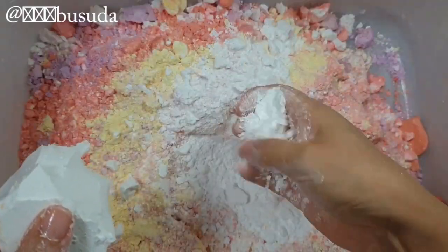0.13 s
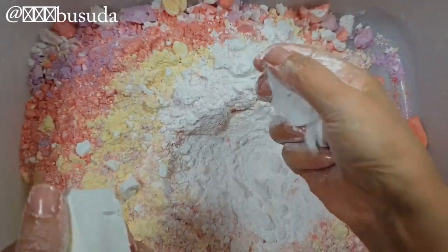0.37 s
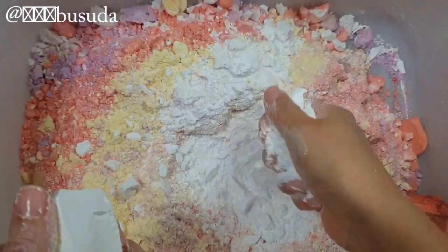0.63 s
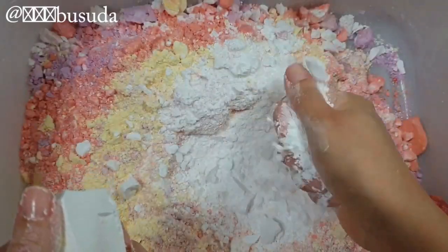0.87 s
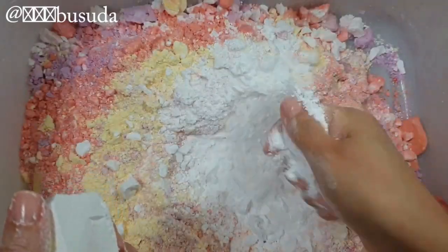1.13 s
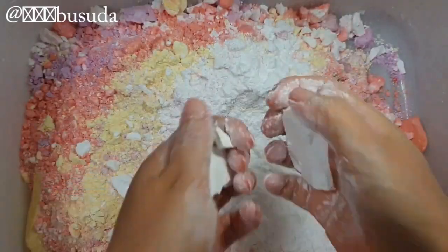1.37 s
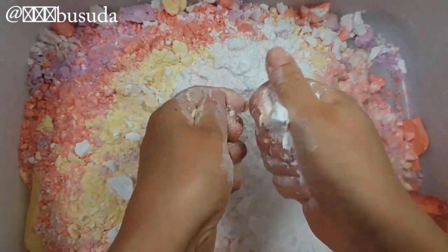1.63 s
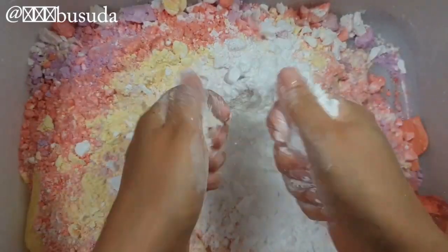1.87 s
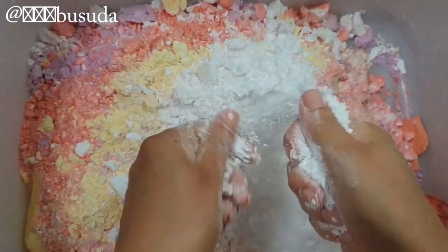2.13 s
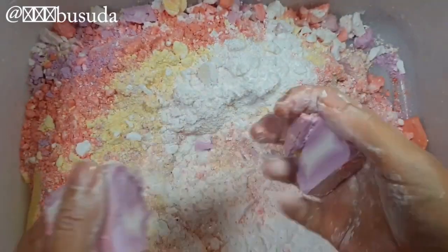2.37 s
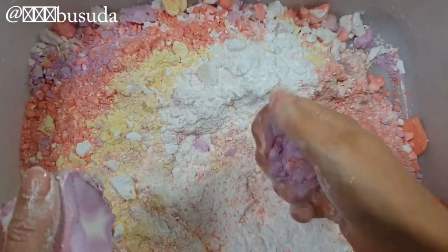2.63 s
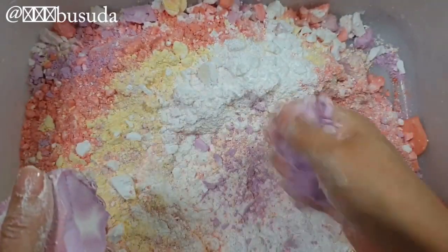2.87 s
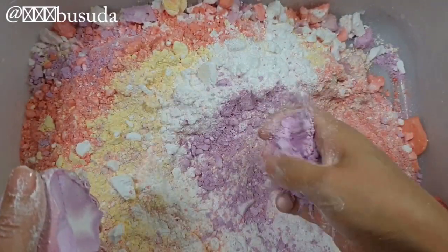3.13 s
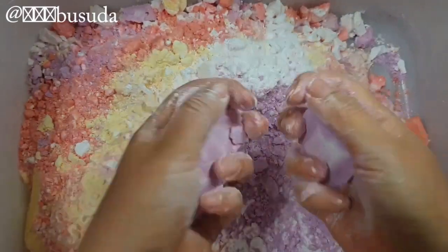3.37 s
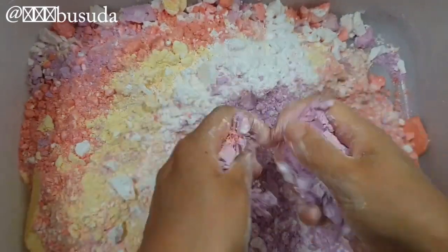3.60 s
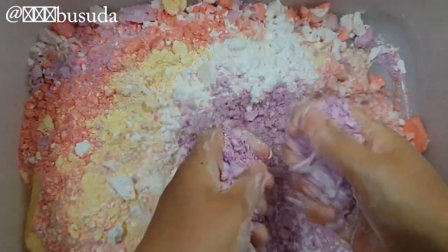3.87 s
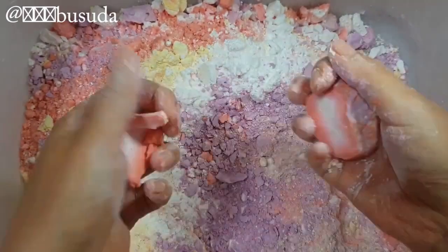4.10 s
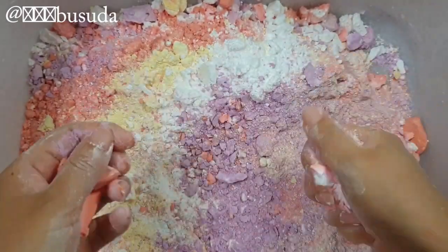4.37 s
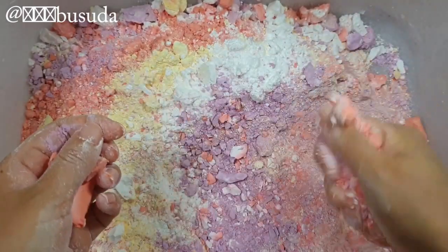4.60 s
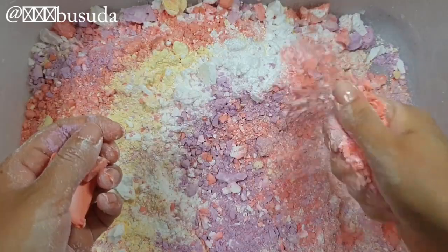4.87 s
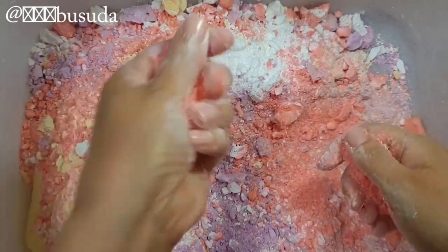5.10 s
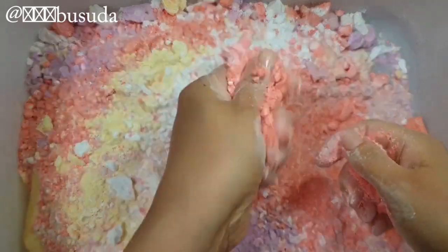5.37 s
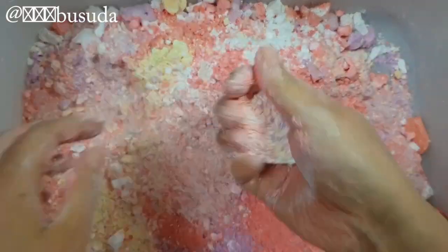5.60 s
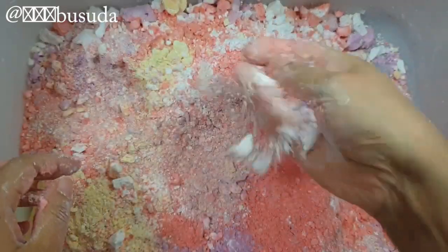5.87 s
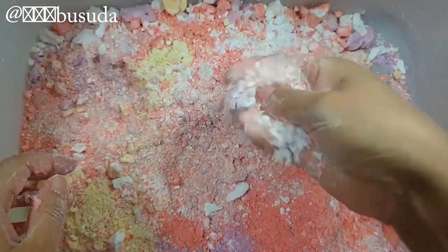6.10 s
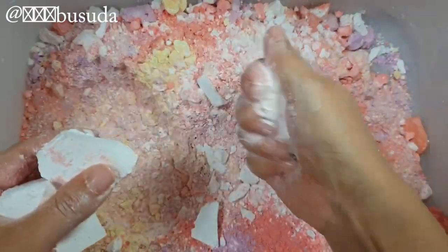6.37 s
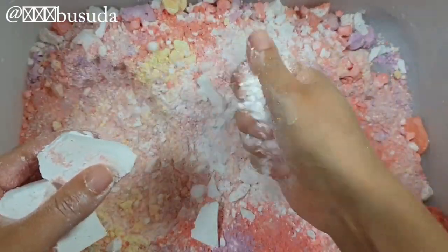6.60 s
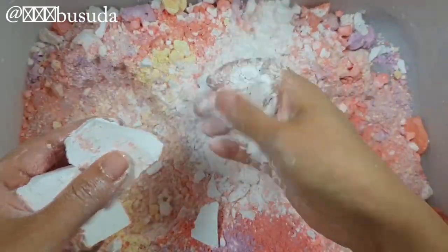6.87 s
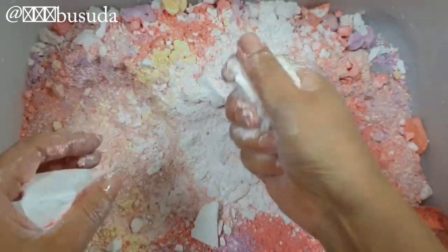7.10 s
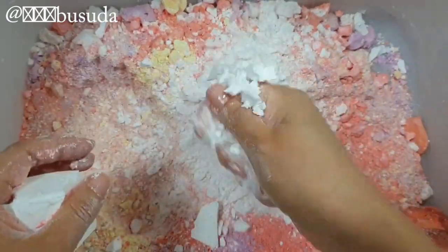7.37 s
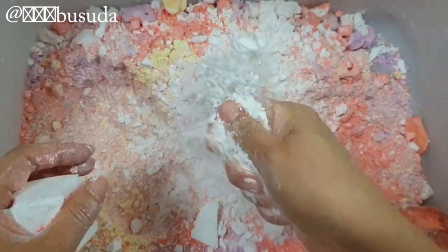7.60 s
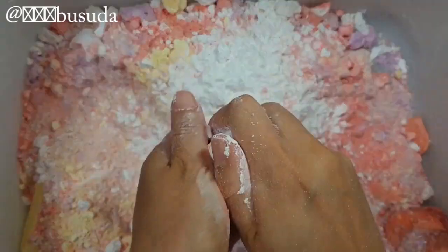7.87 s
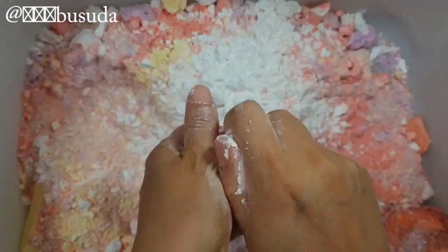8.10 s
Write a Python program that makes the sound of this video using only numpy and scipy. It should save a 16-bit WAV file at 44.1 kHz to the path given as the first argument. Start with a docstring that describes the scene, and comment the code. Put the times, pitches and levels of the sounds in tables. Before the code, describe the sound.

Dry chalk snaps and crumbles in cupped palms, fine powder rustling through the fingers while lumps thud softly onto a heap in a tub.

```python
"""Close above a plastic tub, one microphone: hands squeeze soft chalk blocks. The blocks crack and crunch in
the cupped palms: sharp splits ring the hollow of the hand, and swarms of tiny breaking pieces follow each
squeeze. Powder hisses through the fingers as coloured grains, chunks thud against the tub wall and one hard
piece squeaks. Crumbs and lumps drop on the heap and drum on the tub's resonances, over a faint room noise."""
import sys
import numpy as np
from scipy import signal
from scipy.fft import rfft, irfft, next_fast_len
from scipy.io import wavfile
from scipy.ndimage import map_coordinates

SR = 44100
rng = np.random.default_rng(int(sys.argv[2]) if len(sys.argv) > 2 else 0)


def bounce(signal):
    """Save signal as a 16-bit WAV file at the path given by the first command-line argument."""
    frames = np.transpose(np.atleast_2d(signal))
    limited = np.clip(frames, -1, 1)
    pcm = np.round(limited * 32767).astype(np.int16)
    wavfile.write(sys.argv[1], SR, pcm)


def field_ratio(decibels):
    """Amplitude ratio for a level in dB (20 dB per decade); scalars and array-likes work."""
    return 10 ** (np.asarray(decibels, dtype=float) / 20)


N = 362943  # length in samples

# Resonances of the tub under the heap. Each row: centre in Hz, width in Hz, relative level in dB.
TUB_MODES = [(111.6, 11.2, 2.5), (147.2, 17.7, 3), (235.2, 7.5, 2.5), (322.2, 21, -4), (555.7, 65, -3)]
# Hollow of the cupped palms and chalk pieces. Each row: centre in Hz, width in Hz, relative level in dB.
PALM_MODES = [(1550, 400, 7), (1932, 370, 9.5), (2434, 460, 3.5), (3160, 360, 3), (5390, 2500, -4.5)]
# Moments where all crunching, sifting and cracking falls silent at once, in seconds; the last lies past the
# end.
BREAK_OFFS = [0.21, 1.42, 3.306, 4.165, 7.098, 7.786, 8.002, 9]


def unit(x):
    """Scaled to rms 1."""
    return x / np.sqrt(np.mean(x ** 2) + 1e-20)


def along(points, hz):
    """Values of (Hz, value) points, read on a log frequency axis."""
    f, v = np.transpose(points)
    return np.interp(np.log(hz + 1), np.log(f + 1), v)


def wobble(rate):
    """A smooth random curve, rate knots a second."""
    knots = rng.standard_normal(int(N * rate / SR) + 4)
    return map_coordinates(knots, [np.arange(N) * rate / SR])


def filtered(x, response):
    """x times a complex response of frequency."""
    m = next_fast_len(N + SR // 2)
    return irfft(rfft(x, m) * response(np.fft.rfftfreq(m, 1 / SR)), m)[..., :N]


def coloured(x, spectrum):
    """x through a (Hz, dB) spectrum."""
    return filtered(x, lambda hz: field_ratio(along(spectrum, hz)))


def ringing(x, modes):
    """x exciting damped resonances in parallel, with alternating signs."""
    def response(f):
        total = 0
        for k, (centre, width, db) in enumerate(modes):
            resonance = 1j * f * width / (centre ** 2 - f ** 2 + 1j * f * width)
            total = total + (-1) ** k * field_ratio(db) * resonance
        return total
    return filtered(x, response)


def soft(x, hz):
    """A soft contact: the push is rounded off above hz."""
    return filtered(x, lambda f: 1 / (1 + 1j * f / hz) ** 2)


def grains(per_s, spread_db):
    """Tiny random impulses: most are faint, a few strong."""
    hit = rng.random(N) < per_s / SR
    size = np.minimum(rng.exponential(size=N), 3.5)
    return hit * field_ratio(spread_db * size) * rng.choice([-1, 1], N)


def pieces(level_db, centre_hz, scatter, cycles, spread_db, count):
    """Small pieces break one by one, each a short, softly starting ring at its own pitch."""
    at = rng.integers(0, N, count)
    pitch = np.clip(rng.standard_normal(count), -2, 2)
    size = np.minimum(rng.exponential(size=count), 3.5)
    turns = centre_hz * np.exp(scatter * pitch)[:, None] * np.arange(300) / SR
    swing = np.sin(2 * np.pi * turns) * turns * np.exp(-turns / cycles)
    ring = field_ratio(spread_db * size)[:, None] * swing
    scale = np.sqrt(np.sum(ring ** 2) / N)
    where = (at[:, None] + np.arange(ring.shape[1])).ravel()
    levelled = (ring * field_ratio(level_db[at])[:, None]).ravel()
    return np.bincount(where, levelled, N + ring.shape[1])[:N] / scale


def gestures(rows, sag_db_per_s):
    """Summed power of (start, length, dB) gestures that rise, hold and fall; at the next stop each falls silent
    at once."""
    # pressure builds fast, eases while held and lets go more slowly
    rise_db_per_s, fall_db_per_s = 799.5, 466
    # last grains trickle on under the held level and die away
    trail_db, trail_db_per_s = -20.5, 87.5
    t = np.arange(0, N / SR + .001, .001)
    s, length, db = np.transpose(rows)[:, :, None]
    after = t - s - length
    rise_db = rise_db_per_s * np.minimum(t - s, 0)
    sag_db = sag_db_per_s * np.clip(t - s, 0, length)
    shape_db = rise_db - sag_db - fall_db_per_s * np.maximum(after, 0)
    trickle_db = np.where(t > s + length, trail_db - trail_db_per_s * after, -np.inf)
    shape_db = np.maximum(shape_db, trickle_db)
    going = t < np.take(BREAK_OFFS, np.searchsorted(BREAK_OFFS, s))
    power = np.sum(going * field_ratio(db + shape_db) ** 2, axis=0)
    return np.interp(np.arange(N) / SR, t, power)


def crushing():
    """Grains give way in the palms, dust rubs past dust, crumbs rain on the heap."""
    # Squeezes of the hand. Each row: start in seconds, length in seconds, nominal crunch level in dB.
    squeezes = [(0.021, 0.025, -52.5), (0.088, 0.11, -47), (0.244, 0.013, -55.5), (0.508, 0.062, -46),
                (0.629, 0.079, -44), (0.811, 0.0037, -41), (0.886, 0.11, -49), (1.054, 0.054, -57),
                (1.134, 0.11, -47), (1.24, 0.068, -53.5), (1.372, 0.029, -50.5), (1.611, 0.021, -44),
                (1.646, 0.069, -41.5), (1.747, 0.06, -54), (1.821, 0.02, -55), (1.879, 0.22, -46),
                (2.094, 0.053, -50.5), (2.158, 0.14, -43.5), (2.31, 0.014, -49.5), (2.612, 0.016, -44),
                (2.701, 0.034, -42.5), (2.812, 0.021, -57), (2.896, 0.12, -51.5), (3.108, 0.051, -51.5),
                (3.197, 0.031, -47.5), (3.29, 0.018, -50.5), (3.558, 0.053, -47), (3.731, 0.027, -49),
                (3.82, 0.21, -48.5), (4.02, 0.18, -53), (4.404, 0.037, -57), (4.577, 0.0093, -49),
                (4.652, 0.04, -48.5), (4.745, 0.026, -51.5), (4.904, 0.026, -44.5), (4.979, 0.044, -50.5),
                (5.053, 0.014, -54.5), (5.233, 0.054, -49.5), (5.369, 0.022, -60.5), (5.469, 0.13, -48),
                (5.773, 0.074, -56.5), (5.955, 0.0079, -53.5), (6.04, 0.092, -47), (6.25, 0.007, -61),
                (6.399, 0.063, -48), (6.552, 0.0076, -51), (6.632, 0.075, -42), (6.763, 0.039, -51.5),
                (6.846, 0.03, -43.5), (6.94, 0.082, -49.5), (7.06, 0.015, -46.5), (7.145, 0.07, -56),
                (7.241, 0.031, -42), (7.396, 0.016, -50.5), (7.463, 0.073, -45.5), (7.588, 0.081, -57),
                (7.68, 0.019, -44), (7.754, 0.027, -53), (7.938, 0.035, -49.5), (8.123, 0.075, -60)]
    # Powder rubbed through the fingers without crushing.
    # Each row: start in seconds, length in seconds, nominal hiss level in dB.
    sifts = [(0.338, 0.056, -49), (1.489, 0.18, -54.5), (2.53, 0.081, -56), (3.371, 0.073, -56.5),
             (3.484, 0.17, -57.5), (4.278, 0.017, -58), (4.358, 0.0027, -47), (5.135, 0.036, -59),
             (6.365, 0.052, -49), (7.756, 0.049, -51.5), (7.86, 0.021, -47), (8.155, 0.034, -54)]
    # Spectrum of the powder hiss. Each row: frequency in Hz, relative level in dB.
    powder_spectrum = [(2500, -38), (4500, -17.5), (6500, -9.5), (8800, -0.5), (11000, -6.5), (16500, -17)]
    # Crumbs drumming on the tub. Each row: time in seconds, nominal level in dB.
    crumb_rain = [(0, -50), (1.19, -40.5), (1.5, -51.5), (2.2, -41.5), (3.62, -42), (4, -36), (4.3, -35.5),
                  (4.62, -45), (4.8, -38.5), (5.59, -45.5), (8.23, -44.5)]

    rest_db = -86  # the hand at rest
    crunch_db = 10 * np.log10(gestures(squeezes, sag_db_per_s=43.5) + field_ratio(rest_db) ** 2)
    # a squeeze hisses too, by 0.32 dB more per dB of crunch
    dust = field_ratio(-57 + 0.32 * (crunch_db + 51.5)) ** 2
    powder_db = 10 * np.log10(dust + gestures(sifts, sag_db_per_s=2.0))
    # the grip sticks and slips, so everything in the hand comes in shared clumps
    slip = np.tanh(wobble(60))
    # the mix of fine and coarse grain in the hand keeps changing
    fine = np.tanh(wobble(9.8))
    # fine grit needs both pressure and sliding
    grit_db = 0.47 * crunch_db + 0.43 * powder_db - 3.0 + 2.1 * slip + 3 * fine

    grinding = unit(ringing(grains(per_s=800, spread_db=3.0), PALM_MODES))
    grinding *= field_ratio(crunch_db - 1.0 + 5.6 * slip)
    crunch = pieces(crunch_db - 0.5 + 1.2 * slip,
                    centre_hz=1780, scatter=0.15, cycles=1.3, spread_db=5.0, count=3500)
    # larger pieces yield with a dull thock, whose level follows the squeeze less steeply
    chunks = pieces(0.65 * crunch_db - 14.0 + 8.8 * slip,
                    centre_hz=460, scatter=0.39, cycles=0.45, spread_db=2.0, count=2500)
    # a few hard nuggets pop, each at a pitch of its own
    nuggets = pieces(0.86 * crunch_db - 11.0,
                     centre_hz=2600, scatter=0.53, cycles=0.54, spread_db=6.5, count=800)
    grit = pieces(grit_db, centre_hz=5490, scatter=0.055, cycles=0.26, spread_db=-2.0, count=9000)
    powder = unit(coloured(grains(per_s=3600, spread_db=3.5), powder_spectrum))
    powder *= field_ratio(powder_db + 4.0 * slip + 2.4 * wobble(25))

    # crumbs fall louder while the hand squeezes; the tub rings on after them
    crumbs = soft(grains(per_s=300, spread_db=4.5), hz=294)
    crumb_s, crumb_db = np.transpose(crumb_rain)
    crumbs_db = np.interp(np.arange(N) / SR, crumb_s, crumb_db)
    falling_db = crumbs_db + 0.29 * (crunch_db - crunch_db.mean()) + 4.5 * np.tanh(wobble(25))
    # they land now mid-floor, now near the wall, and wake the low or the high modes more
    place_db = 4 * np.tanh(wobble(6))
    floor = ringing(field_ratio(falling_db + place_db) * crumbs, TUB_MODES[:2])
    wall = ringing(field_ratio(falling_db - place_db) * crumbs, TUB_MODES[2:])
    drumming = (floor + wall) / np.std(ringing(crumbs, TUB_MODES))
    return grinding + crunch + chunks + nuggets + grit + powder + drumming


def cracks():
    """A block creaks, splits in one sharp step and tears raggedly for some ms; a crumb only ticks."""
    # Cracks of a block. Each row: time in seconds, nominal snap level in dB,
    # splinter in dB relative to the snap, knock in dB relative to the snap.
    block_cracks = [(0.498, -26, 1.5, 3.5), (0.5331, -16, -1.5, -9), (0.5375, -18.5, -5, -16.5),
                    (0.613, -41, 3, 0), (0.636, -22.5, -4, -11), (0.6467, -15.5, -35, -14),
                    (0.71, -30, -20, -8), (1.5995, -8.5, -8, -19.5), (1.6735, -11, -6, -11),
                    (1.6854, -10, -13, -18), (1.7612, -24, -4, -6), (1.8987, -30, -5, -5),
                    (2.016, -31, -5.5, -11.5), (2.3066, -41, -13, -7.5), (2.6109, -26.5, -6, 0.5),
                    (3.246, -33.5, -6.5, -5.5), (3.5482, -24.5, -2, -4), (3.5577, -18.5, -39, -12.5),
                    (3.588, -23, -15, -9.5), (3.603, -26.5, -16, -7.5), (3.8793, -33.5, -5, -0.5),
                    (4.028, -32, -30, -11), (4.1557, -30, -4.5, -10), (4.2885, -43.5, -10, -3),
                    (4.3963, -32, -11.5, -8.5), (4.5713, -45, 13, 14.5), (4.9182, -31.5, -3.5, -5),
                    (5.802, -25, -6, -5), (5.815, -24, -7.5, -11), (6.3916, -41, 7, 0.5),
                    (6.4206, -17.5, 1.5, 1), (7.1354, -26, 2.5, 3.5), (7.2285, -24.5, -6, -3),
                    (7.233, -11, -2, -6.5), (7.4512, -33.5, 0.5, -8), ]
    # Crumbs snapping, too small to knock.
    # Each row: time in seconds, nominal snap level in dB, splinter in dB relative to the snap.
    crumb_ticks = [(0.19, -34.5, -27), (0.334, -54, 15.5), (0.503, -30, 2), (0.5301, -18.5, -15),
                   (0.681, -41, 2.5), (0.953, -42, 2), (1.26, -42, -7), (1.576, -42, -2.5), (1.654, -36, 0),
                   (1.665, -35, -4), (1.8112, -32.5, -3), (1.943, -39, -10), (1.963, -32, -7),
                   (2.62, -41, 6), (2.631, -38, -15), (2.665, -36.5, -12), (2.923, -37, -4),
                   (3.579, -39, 10), (3.626, -33, 3), (3.711, -40.5, -14), (4.42, -46, 7), (4.897, -37, -6),
                   (5.272, -43, -7), (5.479, -39, 4), (5.766, -53.5, 15.5), (5.79, -46, 5),
                   (6.098, -38.5, 8.5), (6.258, -38, -4), (6.398, -39, 6), (6.413, -38, -11.5),
                   (6.471, -32.5, -9), (6.543, -41.5, 4.5), (6.63, -40, 9), (6.671, -37, 0),
                   (6.711, -31.5, -16), (7.5047, -27, -12.5), (8.1122, -38, 7), (8.152, -46, 4),
                   (8.176, -42, 4.5), (8.185, -46, 6)]
    # A knock passed on by the hand. Each row: centre in Hz, width in Hz, level in dB.
    hand_modes = [(291, 117, 13.5), (563, 149, 12.5), (880, 1800, -7)]
    # Spectrum of the splintering. Each row: frequency in Hz, level in dB.
    splinter_spectrum = [(2000, -41.5), (3600, 23.5), (5000, 32.5), (8500, 30), (11000, 23), (16000, 10)]

    tear_s, tick_tear_s = 0.021, 0.0096  # t60 of the ragged tearing after a crack and after a tick
    t = np.arange(SR // 20) / SR - .005  # seconds from the split
    split = np.argmax(t >= 0)
    snap, splinter, knock, own = np.zeros((4, N + len(t)))
    rows = [(*row, tear_s) for row in block_cracks]
    rows += [(*row, -np.inf, tick_tear_s) for row in crumb_ticks]
    for s, db, splinter_db, knock_db, t60 in rows:
        tear, grit = rng.standard_normal((2, len(t)))
        # the creak swells up to the split, the tearing dies after it
        fade_db = np.where(t >= 0, -60 * t / t60, -12 + 60 * t / 0.013)
        burst = field_ratio(fade_db) * tear * (np.abs(grit) > 1.1)
        burst *= .26 * np.linalg.norm(field_ratio(fade_db)) / np.linalg.norm(burst)
        burst[split] += 2.2
        at = round((s - .0035) * SR)
        here = slice(at, at + len(t))
        snap[here] += field_ratio(db + 16.5) * burst
        splinter[here] += field_ratio(db + splinter_db - 15.5) * burst
        # the broken piece also rings briefly at three random pitches of its own
        turns = 1300 * 4.5 ** rng.random((3, 1)) * np.maximum(t, 0)
        own[here] += field_ratio(db - 12) * np.sum(np.sin(2 * np.pi * turns) * np.exp(-turns / 3.5), axis=0)
        knock[at + split] += field_ratio(db + knock_db + 36)
    # flesh rounds off the snap and, more so, the knock
    thump = soft(knock[:N], hz=1800)
    body = ringing(thump, hand_modes) + field_ratio(1.5) * ringing(thump, TUB_MODES)
    snapping = ringing(soft(snap[:N], hz=4970), PALM_MODES)
    return snapping + coloured(splinter[:N], splinter_spectrum) + body + own[:N]


def unbroken():
    """Gain that falls to nothing at each stop and then returns."""
    return_s = 0.043  # time to come back to full level
    t = np.arange(N) / SR
    gains = [np.where(t < s, 1, np.clip((t - s) / return_s, 0, 1) ** 2) for s in BREAK_OFFS]
    return np.prod(gains, axis=0)


def thuds():
    """Each knock is about one soft swing at the chunk's pitch, then fragments; the tub takes it up."""
    # Chunks landing dully against the tub wall, without a split. Each row: time in seconds, peak of the first
    # swing in dB, pitch in Hz.
    chunk_knocks = [(0.107, -6.5, 925), (0.793, -29, 736), (1.177, -31, 550), (1.309, -29, 980),
                    (2.156, -28.5, 654), (2.733, -23.5, 1100), (3.369, -26.5, 535), (3.962, -22.5, 540),
                    (4.127, -26.5, 650), (4.655, -24, 334), (4.679, -17.5, 1140), (6.995, -23, 1090),
                    (7.023, -19.5, 640), (7.936, -24, 500), (7.944, -26.5, 513), (7.95, -18.5, 530)]
    # the chunk then falls apart in smaller knocks, the later the fainter
    crumble_s, crumble_db, crumble_fades_db = 0.032, -14.5, 14
    knock = np.zeros(N + SR)
    for s, db, hz in chunk_knocks:
        late, higher = rng.random((2, 8))
        bit_s = s + crumble_s * late
        bit_db = db + crumble_db - crumble_fades_db * late
        bit_hz = hz * (.6 + 0.79 * higher)
        for at, level_db, pitch in [(s, db, hz), *zip(bit_s, bit_db, bit_hz)]:
            turns = pitch * np.arange(SR // 50) / SR
            swing = np.sin(2 * np.pi * turns) * turns * np.exp(-turns / 0.37)  # decay in cycles
            knock[round(at * SR):][:len(turns)] += field_ratio(level_db) * swing / np.abs(swing).max()
    knock = knock[:N]
    return knock + field_ratio(8.5) * ringing(np.abs(knock), TUB_MODES)


def lumps():
    """A lump lands softly on the heap and the tub booms."""
    # Lumps landing in the tub. Each row: time in seconds, peak of its boom in dB.
    landings = [(0.207, -24.5), (0.246, -25), (0.656, -21.5), (0.8, -20.5), (1.24, -24), (2.057, -21),
                (2.705, -15), (2.724, -17), (2.768, -28), (3.382, -21.5), (3.972, -25.5), (4.035, -34),
                (4.52, -24.5), (4.54, -24.5), (4.56, -15.5), (5.017, -25), (5.922, -25.5), (6.112, -24),
                (6.256, -18), (6.973, -24), (7.229, -20), (7.942, -18.5), (8.12, -25), (8.16, -26.5)]
    push = np.zeros((2, N))
    push[1, 0] = 1  # a lone push, to scale the boom by its peak
    for s, db in landings:
        push[0, round(s * SR)] += field_ratio(db)
    boom, single = ringing(soft(push, hz=177), TUB_MODES)
    return boom / np.abs(single).max()


def squeak():
    """A hard piece skids on another: a short rough rub that rings in narrow high tones."""
    # The skid: centre in seconds, half length in seconds, level in dB.
    skid = (3.324, 0.0062, -36)
    # Tones of the hard piece. Each row: centre in Hz, width in Hz, relative level in dB.
    shard_modes = [(7500, 850, -0.5), (9900, 90, -2)]
    s, half, db = skid
    swell = np.exp(-.5 * ((np.arange(N) / SR - s) / half) ** 2)
    return field_ratio(db) * swell * unit(ringing(grains(per_s=2800, spread_db=3.0), shard_modes))


def walls(x):
    """The tub walls and the room answer with a noise tail; each frequency dies at its own speed."""
    # Decay of the answer. Each row: frequency in Hz, t60 in seconds.
    wall_decay = [(300, 0.21), (2000, 0.04), (10000, 0.03)]
    hz, t, z = signal.stft(rng.standard_normal(SR // 4), SR, nperseg=256)
    fade = field_ratio(-60 * t / along(wall_decay, hz)[:, None])
    tail = signal.istft(z * fade, SR, nperseg=256)[1]
    delayed = np.pad(x, (60, 0))  # samples
    return signal.fftconvolve(delayed, tail / np.linalg.norm(tail))[:N]


def room_noise():
    """The faint steady noise of the place: random noise with most of its level in the bass."""
    # Spectrum of the noise. Each row: frequency in Hz, relative level in dB.
    room_spectrum = [(40, -30), (90, -4.5), (300, -13.5), (700, -34.5), (4000, -66), (9000, -50),
                     (16000, -69.5)]
    return field_ratio(-47.5) * unit(coloured(rng.standard_normal(N), room_spectrum))


def scene():
    """All sources reach one microphone; the two channels differ only faintly, most in the treble."""
    # Difference between the two channels. Each row: frequency in Hz, level in dB.
    apart = [(180, -76.5), (1650, -28.5), (15000, -18)]
    sharp = cracks()
    answered = unbroken() * (sharp + field_ratio(-25) * walls(sharp))
    mono = answered + crushing() + thuds() + lumps() + squeak() + room_noise()
    side = coloured(walls(mono), apart)
    return np.array([mono + side, mono - side])


def low_pass(x):
    """Removes everything above the highest recorded frequency."""
    return signal.sosfilt(signal.butter(12, 16990, fs=SR, output="sos"), x)


def record(dry):
    """The microphone drops the deepest bass, the loudest cracks touch full scale, the band ends."""
    top_hz = 16200
    heard = filtered(dry, lambda hz: 1j * hz / (30 + 1j * hz))
    clipped = heard / (1 + np.abs(heard) ** 6) ** (1 / 6)
    banded = filtered(clipped, lambda hz: 1 / (1 + (hz / top_hz) ** 60))
    return low_pass(banded)


dry = scene()
out = record(dry)
bounce(out)
```